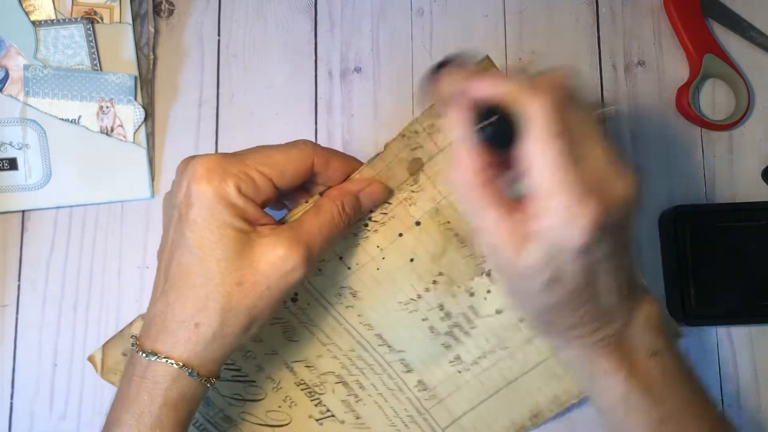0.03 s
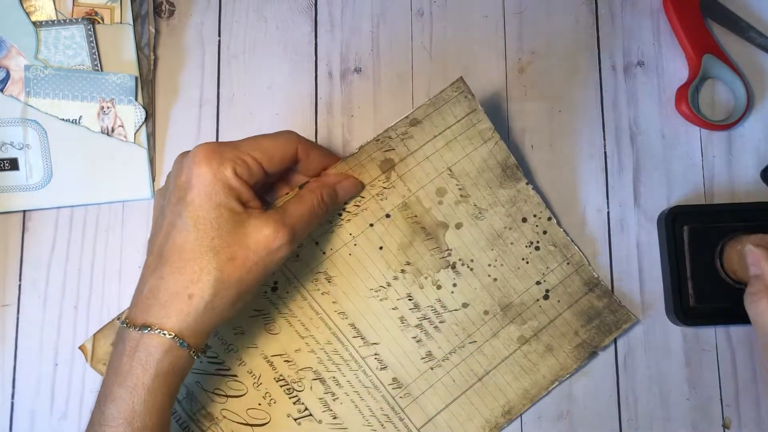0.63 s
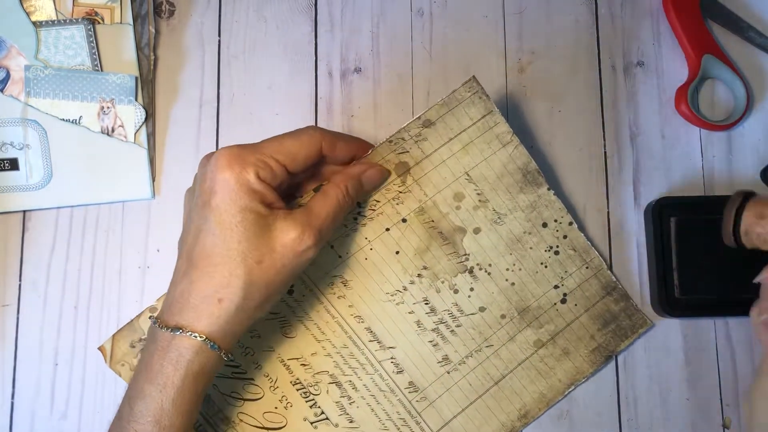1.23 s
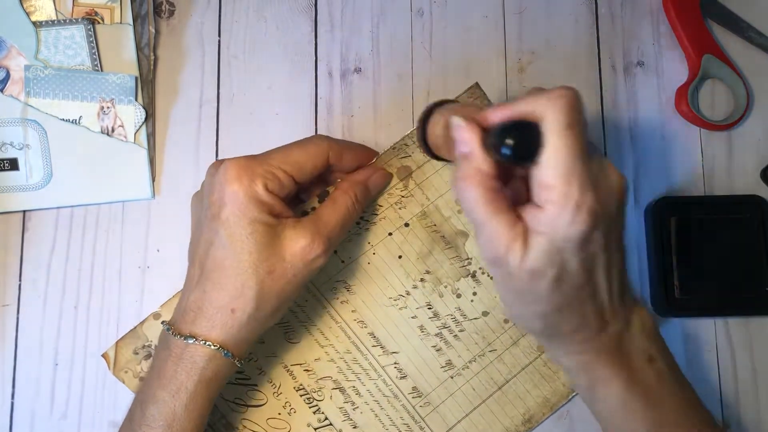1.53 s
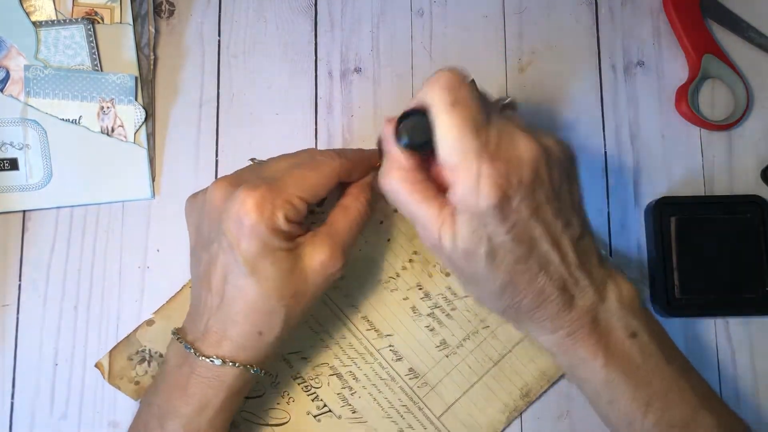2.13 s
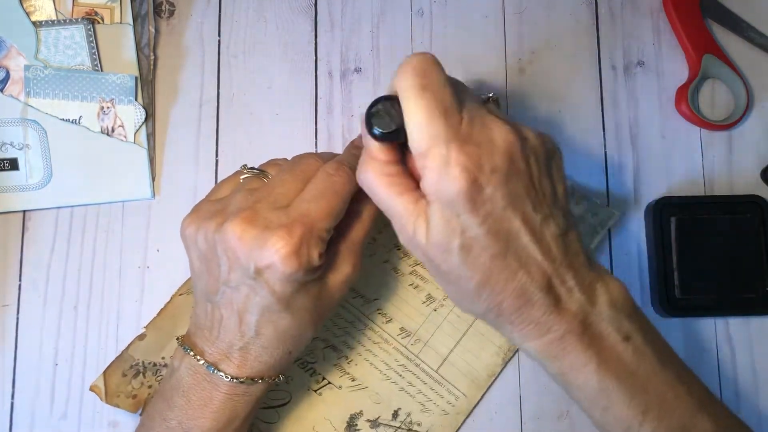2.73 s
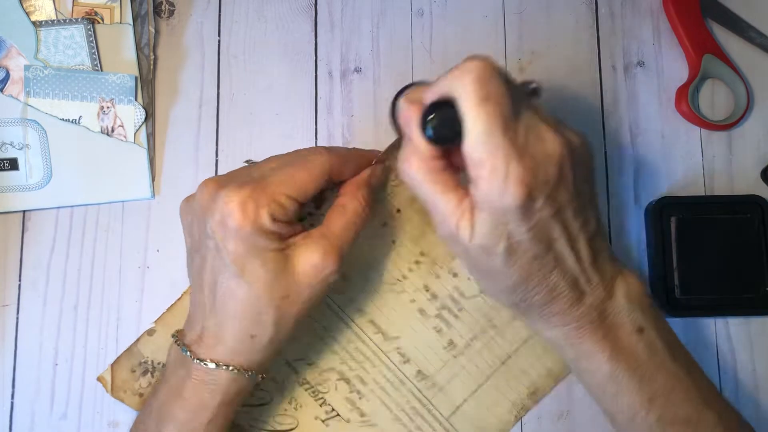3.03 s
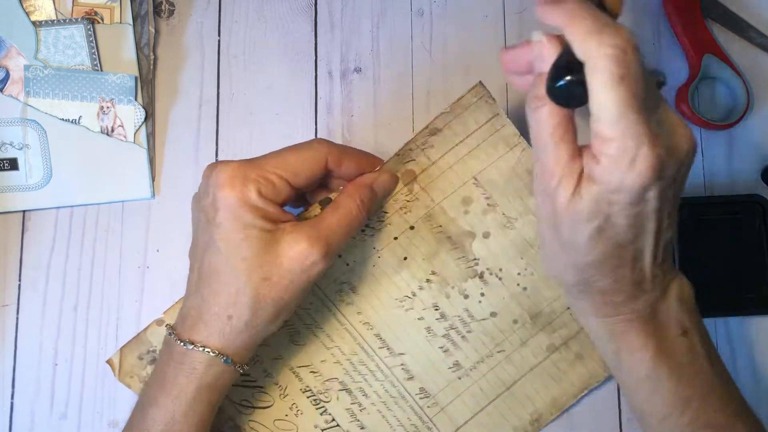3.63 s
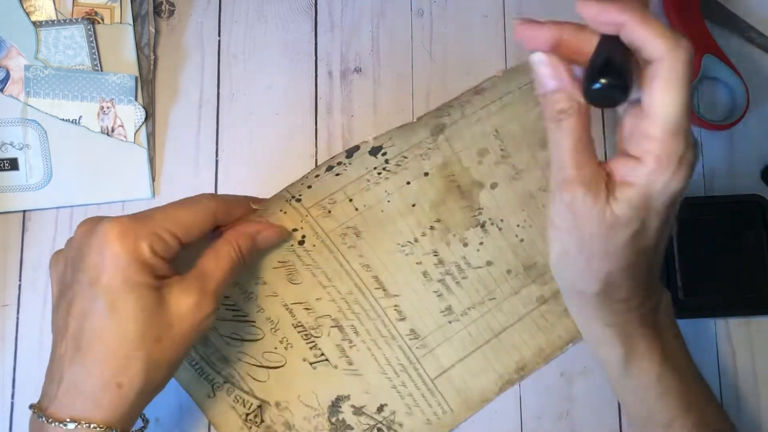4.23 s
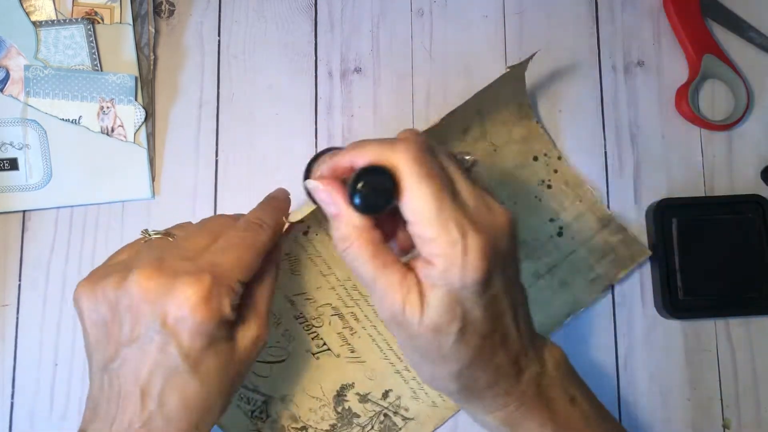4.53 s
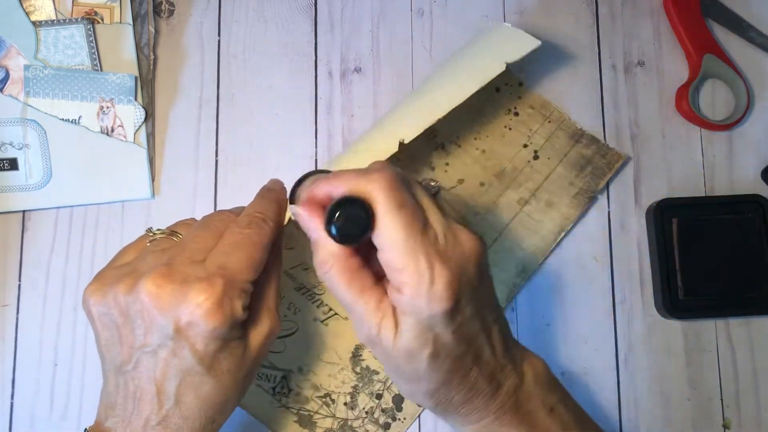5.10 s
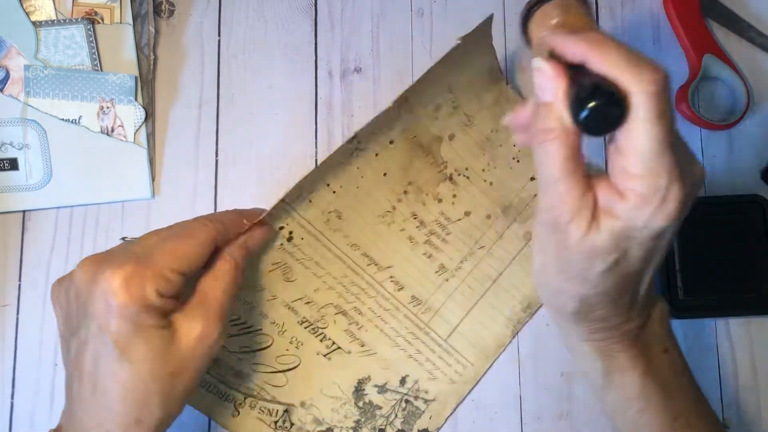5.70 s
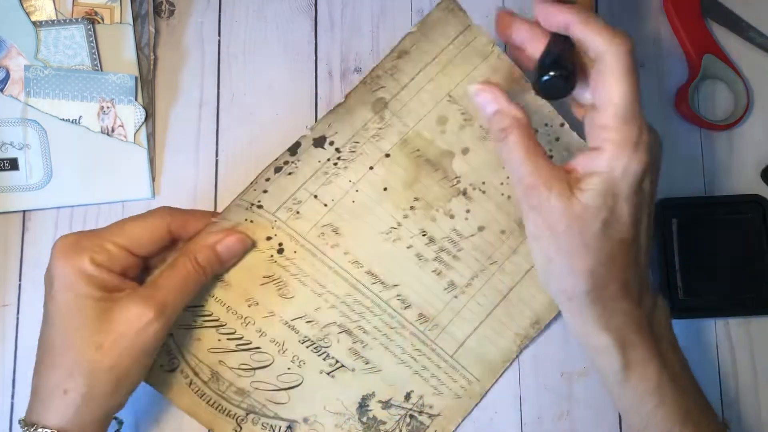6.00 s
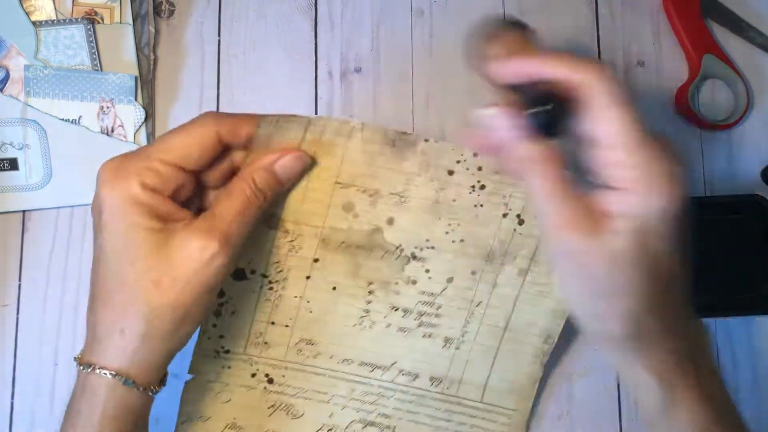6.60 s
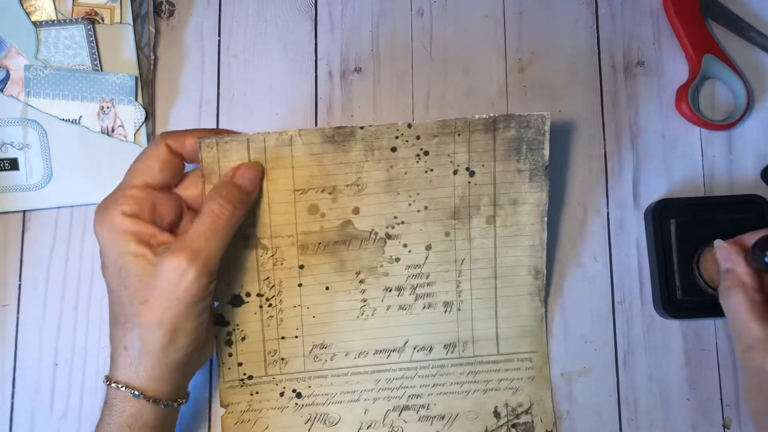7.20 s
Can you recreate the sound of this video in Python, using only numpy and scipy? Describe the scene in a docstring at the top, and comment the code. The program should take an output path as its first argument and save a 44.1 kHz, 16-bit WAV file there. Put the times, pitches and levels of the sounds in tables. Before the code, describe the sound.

Close up in a small, quiet room, foam rubs along the edge of a sheet of paper in two bouts of quick, dry scuffs, with a few sharp clicks of a wooden handle on the table. Before, between and after the bouts, the paper slides and gives small snaps. Faint dabs on an ink pad come near the start and at the end, over a soft low hum.

```python
"""Inking a paper edge with a foam tool

A foam blending tool scuffs the edge of a sheet in quick strokes, and friction sets paper and table ringing.
Its wooden handle knocks on the craft table and dabs the ink pad; between bouts the sheet slides
and snaps as it is turned. A soft 80 Hz hum fills the small, quiet room. The sound is close and mono."""
import sys
import numpy as np
from scipy import signal
from scipy.fft import rfft, irfft, next_fast_len
from scipy.io import wavfile
from scipy.ndimage import uniform_filter1d

SR = 44100
rng = np.random.default_rng(int(sys.argv[2]) if len(sys.argv) > 2 else 0)


def generate_wav(sig):
    """Save sig (samples, or channels by samples) to the path in sys.argv[1] as 16-bit PCM at SR."""
    pcm = np.round(np.clip(np.atleast_2d(sig).T, -1, 1) * 32767).astype(np.int16)
    wavfile.write(sys.argv[1], SR, pcm)


N = 324135
TIME = np.arange(N) / SR
HIT_SIZE = 4096   # samples in one impact


def scuffs(level_db):
    """Friction excitation: foam bites on the paper edge; grip and curl decide which parts ring."""
    # Each row: start in seconds, length in seconds, place of the peak from 0 to 1, relative level in dB,
    # share passed on to the table in dB.
    strokes = [(-0.02, 0.14, 0.37, -48.5, -12.5), (1.696, 0.1, 0.18, -55, -2),
               (1.791, 0.092, 0.43, -48.5, -8.5), (1.903, 0.12, 0.17, -52, -17),
               (2.013, 0.11, 0.4, -50, -5), (2.121, 0.12, 0.36, -49.5, -11), (2.228, 0.1, 0.24, -46.5, -8),
               (2.34, 0.099, 0.45, -46.5, -17), (2.427, 0.095, 0.45, -48, -10.5),
               (2.508, 0.048, 0.3, -52.5, -12), (2.54, 0.098, 0.46, -47.5, -8.5),
               (2.637, 0.099, 0.35, -49.5, -11), (2.75, 0.16, 0.26, -50, -10),
               (2.857, 0.14, 0.13, -51.5, -10), (2.983, 0.093, 0.56, -50, -5),
               (3.062, 0.11, 0.67, -58.5, -3), (3.185, 0.105, 0.43, -54, -12),
               (3.294, 0.1, 0.21, -52.5, -16), (3.392, 0.14, 0.49, -49, -33),
               (4.572, 0.089, 0.25, -51.5, -19), (4.639, 0.2, 0.14, -52.5, -7.5),
               (4.775, 0.1, 0.43, -48.5, -4.5), (4.866, 0.13, 0.54, -48.5, -14),
               (5.021, 0.12, 0.39, -48, -9.5), (5.134, 0.043, 0.6, -56, -21.5),
               (5.171, 0.13, 0.24, -47.5, -15), (5.305, 0.15, 0.22, -47, -9),
               (5.452, 0.19, 0.37, -46.5, -14.5)]
    # Spectra of what a stroke excites. Each row: frequency in Hz, relative density in dB.
    foam_rasp = [(1900, -6), (2700, -3.5), (3100, -1.5), (4100, 1.5), (4800, -1), (5800, 1.5), (7000, -1),
                 (8800, -6), (11000, -54)]
    paper_edge = [(650, -40), (800, 2), (920, 3.5), (1070, 13), (1450, 10), (1750, 0), (2100, -15),
                  (2700, 8), (3150, -3), (3600, 1.5), (4400, -19)]
    paper_sheet = [(1000, -17), (1500, 2), (1850, 13), (2250, 7.5), (2700, 0), (3300, -56)]
    fibre_air = [(7000, -15), (9000, -6), (12000, -9), (15800, -13.5)]
    table_rub = [(120, -1.5), (220, -6), (300, 9), (400, -8.5), (540, 5.5), (720, 1), (1000, -8)]
    # The edge is damped as the tool nears the holding fingers.
    # Each row: time in seconds, ring of the edge against the rasp in dB.
    edge_freedom = [(0.0, 0.5), (1.94, 1.5), (2.15, -4.5), (2.42, -13), (2.82, -11.5), (3.06, 5), (3.48, 0),
                    (4.78, -6), (5.0, -11)]
    # An edge curled off the table is brighter. Each row: time in seconds, curl from 0 to 1.
    edge_curl = [(0.0, 0.9), (1.9, 0.6), (2.2, 0), (3.3, 0.2), (3.5, 0.5), (4.6, 1), (5.6, 0.9)]
    brush_db, brush_stretch = -25.5, 1.18   # the lifting foam keeps brushing, softer and longer
    force, table_force = np.zeros((2, N))
    for start, length, peak, db, table_db in strokes:
        phase = swing(length, peak)
        pressure = np.abs(np.sin(np.pi * phase)) * np.interp(phase, [.5, 1], [1, .4])
        brush = np.abs(np.sin(np.pi * swing(length * brush_stretch, peak=.9)))
        push = np.sqrt(2) * pressure ** 3   # only the hardest part of a stroke moves the table
        add(force, start, pressure * from_db(db))
        add(force, start, brush * from_db(db + brush_db))
        add(table_force, start, push * from_db(db + table_db))
    edge_db = np.interp(TIME, *np.transpose(edge_freedom))
    curl = np.interp(TIME, *np.transpose(edge_curl))
    rasp = noise(foam_rasp)
    edge = from_db(edge_db) * noise(paper_edge)
    sheet = from_db(-10 + 5.5 * curl) * noise(paper_sheet)
    air = from_db(-8 + 4.5 * curl) * noise(fibre_air)
    rub = force * (rasp + edge + sheet + air) + table_force * noise(table_rub)
    roughness = grain(catch_db=1.07, catches_per_s=1900, judder_db=2.03, judders_per_s=140)
    return from_db(level_db) * rub * roughness


def sliding(body_db, hiss_db, air_db):
    """Sliding friction: paper hisses over wood and skin, brighter when the sheet is swung faster."""
    # Each row: start in seconds, length in seconds, relative level in dB, extra body and extra air in dB.
    slides = [(0.15, 0.045, -60, -1, 2), (0.189, 0.15, -55, -2, -0.5), (0.31, 0.26, -70.5, 0.5, 9),
              (0.593, 0.34, -61.5, -4.5, 1), (0.861, 0.21, -57.5, -3, 2), (1.06, 0.2, -56, -1, -0.5),
              (1.175, 0.091, -55.5, -5.5, -2.5), (1.285, 0.15, -66, -1.5, 4), (1.567, 0.11, -65.5, 3.5, 2),
              (3.606, 0.097, -59, 0, -3), (3.766, 0.13, -49.5, 4, -1), (3.896, 0.095, -55, 1.5, 3.5),
              (3.981, 0.078, -47.5, 0, -3), (4.048, 0.035, -59.5, -0.5, -2), (4.075, 0.12, -52.5, 3.5, 1),
              (4.172, 0.16, -55, 4, 1.5), (4.344, 0.75, -64.5, 1, 7), (4.537, 0.05, -59.5, -2.5, 3),
              (5.587, 0.15, -54, -1.5, -1), (5.765, 0.16, -63.5, 3, 4), (6.028, 0.043, -55.5, 5.5, 0),
              (6.06, 0.18, -55.5, 3, 0), (6.202, 0.36, -51.5, 1.5, 1.5), (6.487, 0.53, -57.5, 0.5, 0.5),
              (6.913, 0.47, -59.5, 0, 4)]
    # Spectrum of the rub. Each row: frequency in Hz, relative density in dB.
    colour = [(250, -10), (480, -11.5), (700, -14), (930, 1), (1100, 2.5), (1450, -1), (2150, 0),
              (2700, -0.5), (4500, 3.5), (5150, 4), (5800, -1), (6900, -2), (8200, -10), (16000, -18)]
    usual_db, body_growth, air_growth = -54, 0.74, 1.7   # growth in dB per dB of hiss
    rub = noise(colour)
    body = cut(rub, 2500, "low", order=4)
    hiss = cut(cut(noise(colour), 2500, "high", order=4), 8000, "low", order=4)
    air = cut(rub, 8000, "high", order=4)
    power = np.zeros((3, N))
    for start, length, db, extra_body_db, extra_air_db in slides:
        speed = np.abs(np.sin(np.pi * swing(length, peak=0.33))) ** 0.69
        vigour_db = db - usual_db
        levels = (body_db + body_growth * vigour_db + extra_body_db,
                  hiss_db + vigour_db,
                  air_db + air_growth * vigour_db + extra_air_db)
        for band_power, band_db in zip(power, levels):
            add(band_power, start, (speed * from_db(usual_db + band_db)) ** 2)
    out = np.sum(np.sqrt(power) * [rms_one(band) for band in (body, hiss, air)], axis=0)
    return out * grain(catch_db=2.0, catches_per_s=1700, judder_db=1.5, judders_per_s=69)


def knocks(knock_db, tap_db, dab_db):
    """Impact excitation: hard knocks, cushioned taps and the rocking ink pad sound through the table."""
    # The handle hits the table. Each row: time in seconds, relative level in dB, low and high edge in Hz,
    # chatter in seconds, bending-wave lag in seconds, ring of the handle in dB.
    handle_knocks = [(1.7093, -25, 860, 4100, 0.00045, 0.00075, 9.5),
                     (2.051, -42.5, 100, 7700, 0.0014, 0.0019, 1),
                     (2.386, -45, 150, 8050, 0.0014, 0.002, -1),
                     (2.587, -48.5, 100, 8000, 0.0011, 0.00274, -12),
                     (3.504, -32, 1200, 4080, 0.0023, 0.0018, -11),
                     (3.8304, -39, 398, 4570, 0.0036, 0.0027, -1),
                     (4.7545, -29.5, 200, 4180, 0.0016, 0.00255, 8),
                     (4.813, -31, 250, 4940, 0.0025, 0.0011, 12)]
    # Foam, hand or sheet lands softly. Each row: time in seconds, relative level in dB,
    # low and high edge in Hz, chatter in seconds.
    taps = [(0.061, -51.5, 80, 1200, 0.0055), (0.228, -48, 150, 1100, 0.004), (0.301, -52, 150, 730, 0.002),
            (2.794, -52, 300, 362, 0.0022), (2.957, -52, 150, 503, 0.0019),
            (3.037, -46, 59.6, 1100, 0.0019), (3.6856, -44.5, 200, 1030, 0.0022),
            (3.938, -48, 200, 1960, 0.003), (4.584, -52.5, 100, 294, 0.0017),
            (6.122, -47.5, 600, 1040, 0.0041), (6.156, -51, 1000, 1300, 0.00406),
            (6.262, -50, 200, 1260, 0.0041), (6.4621, -48, 700, 1100, 0.0038),
            (6.472, -39, 990, 1390, 0.003), (6.486, -48, 200, 1300, 0.0046)]
    # The ink pad rocks under the tool. Each row: time in seconds, relative level in dB.
    dabs = [(0.758, -56), (0.779, -58), (0.808, -54.5), (0.845, -56), (0.869, -55), (7.214, -52),
            (7.304, -58.5), (7.331, -57.5)]
    out = np.zeros(N)
    for start, db, *touch in handle_knocks:
        add(out, start, blow(db + knock_db, *touch))
    for start, db, *touch in taps:
        add(out, start, blow(db + tap_db, *touch, lag_s=0.00325, handle_db=1))
    for start, db in dabs:
        dab = blow(db + dab_db, low_hz=302, high_hz=800, chatter_s=0.00062, lag_s=0.00545, handle_db=1)
        add(out, start, dab)
    return out


def blow(db, low_hz, high_hz, chatter_s, lag_s, handle_db):
    """Dispersion: bending waves carry highs faster than lows, so the ring of a blow falls in pitch."""
    # Modes of table top and wooden handle. Each row: frequency in Hz, bandwidth in Hz, gain in dB.
    table_modes = [(146, 46, -1), (277, 95, 0), (346, 94, -10.5), (500, 240, -8.5), (690, 170, -15),
                   (815, 130, -5.5), (1030, 106, 3.5), (1203, 72, 3.5), (1407, 62, -2), (1640, 80, -3)]
    handle_modes = [(1970, 440, -4.5), (2460, 330, -10.5), (4080, 860, -14.5), (6500, 3400, -14)]
    hz = np.fft.rfftfreq(HIT_SIZE, 1 / SR) + 1
    body = ringing(table_modes, hz) + from_db(handle_db) * ringing(handle_modes, hz)
    force = bounces(chatter_s, rebound=0.5, count=3)
    force = cut(cut(force, low_hz, "high", order=1), high_hz, "low", order=3)
    delay_s = lag_s * np.maximum(np.sqrt(1000 / hz) - np.sqrt(500 / high_hz), 0)
    travel = np.exp(-2j * np.pi * np.cumsum(delay_s) * SR / HIT_SIZE)
    return at_level(irfft(rfft(force) * body * travel), db)


def ringing(modes, hz):
    """Modal superposition: a body's frequency response is the sum of its damped resonances."""
    return sum(from_db(db) / (1 + 1j * (hz ** 2 - mode_hz ** 2) / (hz * width))
               for mode_hz, width, db in modes)


def bounces(chatter_s, rebound, count):
    """All-pass chain: tiny rebounds spread a blow in time and leave its colour alone."""
    turn = -2j * np.pi * np.fft.rfftfreq(HIT_SIZE)
    force = 1
    for gap in np.ceil(rng.uniform(.4, 1.6, count) * chatter_s * SR / count):
        delay = np.exp(turn * gap)
        force = force * (rebound + delay) / (1 + rebound * delay)
    return irfft(force)


def snaps(level_db, spread):
    """Sudden elastic release: the sheet buckles, slips off a fingernail or is caught by the foam."""
    # Each row: time in seconds, relative level in dB, band centre in Hz, crumple time in seconds.
    paper_snaps = [(0.6143, -46.5, 2900, 0.0036), (0.649, -50.5, 2400, 0.0007), (1.8095, -51, 2600, 0.0016),
                   (1.8485, -56, 2600, 0.00042), (1.9238, -53, 1700, 0.0018), (2.033, -51, 2000, 0.0013),
                   (2.2406, -46.5, 2000, 0.0017), (2.31, -42, 4100, 0.0095), (2.7868, -50, 2700, 0.0043),
                   (3.0226, -46, 2410, 0.002), (3.089, -53, 2400, 0.0013), (3.1954, -54.5, 2490, 0.00073),
                   (3.312, -50, 2800, 0.0018), (3.771, -56.5, 2500, 0.0023), (3.8604, -44, 1700, 0.0041),
                   (3.9237, -41.5, 2110, 0.0058), (4.1151, -45.5, 2000, 0.0012),
                   (4.263, -42.5, 2410, 0.0031), (4.292, -56, 2000, 0.0023), (4.88, -49, 4500, 0.004),
                   (5.0315, -44, 1850, 0.0036), (5.2447, -47.5, 2800, 0.002), (5.347, -38.5, 2200, 0.0021),
                   (5.5387, -44.5, 4000, 0.00088), (5.774, -54, 2380, 0.0051), (6.4009, -46, 2000, 0.0017),
                   (6.5492, -47, 3160, 0.0045), (7.0107, -44, 3500, 0.00025)]
    out = np.zeros(N)
    for start, db, hz, crumple_s in paper_snaps:
        crackle = contact(crumple_s, chatter_db=-6.5)
        crackle = cut(cut(crackle, hz / spread, "high", order=2), hz * spread, "low", order=2)
        add(out, start, at_level(crackle, db + level_db))
    return out


def contact(chatter_s, chatter_db):
    """Contact chatter: an impulse, then a run of tiny bounces that swells and dies."""
    age = TIME[:HIT_SIZE] / chatter_s
    force = from_db(chatter_db) * rng.standard_normal(HIT_SIZE) * np.sqrt(age) * np.exp(-age)
    force[0] += 1
    return force


def crinkles(rubbing, level_db, per_s, spread_db):
    """Shot noise: single fibres flick free at random, ticking louder the harder the rub."""
    effort = np.sqrt(np.abs(uniform_filter1d(rubbing ** 2, size=882)))   # rms over 20 ms
    sizes = from_db(spread_db * np.minimum(rng.exponential(1, N), 3)) * rng.choice([-1, 1], N)
    ticks = sizes * (rng.random(N) < per_s / SR) + 1e-18
    ticks = cut(cut(ticks, 830, "high", order=2), 9200, "low", order=1)
    return from_db(level_db) * effort * rms_one(ticks)


def pad_twist():
    """Light friction: foam twisted on the ink pad sings in a few low and middle bands."""
    # Each row: time in seconds, level in dB.
    envelope = [(.64, -85), (.68, -57), (.76, -72), (.87, -60.5), (.95, -60.5), (1.04, -65), (1.14, -60),
                (1.24, -81), (1.28, -88)]
    # Each row: frequency in Hz, relative density in dB.
    colour = [(250, -15), (430, 1), (560, -7), (700, -10), (1300, -3), (1800, -5), (2150, -1), (2700, -17),
              (4000, -28)]
    return soft_rub(envelope, colour)


def fingertip_glide():
    """Skin friction: fingertips gliding over the sheet hiss in a narrow band near 5 kHz."""
    # Each row: time in seconds, level in dB.
    envelope = [(6.55, -83), (6.65, -83), (6.8, -75), (6.95, -68), (7.1, -69), (7.29, -61), (7.35, -87)]
    # Each row: frequency in Hz, relative density in dB.
    colour = [(3800, -28), (4700, -3), (5100, 2), (5500, -9), (6300, -20)]
    return soft_rub(envelope, colour)


def soft_rub(envelope, colour):
    """Amplitude modulation: a slow rub is coloured noise under a smooth envelope and a coarse grain."""
    times, db = np.transpose(envelope)
    rub = np.interp(TIME, times, from_db(db), left=0, right=0) * noise(colour)
    return rub * grain(catch_db=3.5, catches_per_s=550, judder_db=2.5, judders_per_s=62)


def grain(catch_db, catches_per_s, judder_db, judders_per_s):
    """Uneven friction as a gain of rms 1: single fibres catch, and the hand judders more slowly."""
    return rms_one(from_db(catch_db * drift(catches_per_s) + judder_db * drift(judders_per_s)))


def swing(length_s, peak):
    """Progress of a hand movement from 0 to 1, passing halfway at the share `peak` of its time."""
    elapsed = np.linspace(0, 1, round(length_s * SR))
    return np.interp(elapsed, [0, peak, 1], [0, .5, 1])


def near_echoes(x, echo_db, longest_s, moves_per_s):
    """Comb filtering: echoes off sheet and hand travel shifting paths, so the colour keeps changing."""
    out = x.copy()
    for path in (.5, .75, 1):
        lag_s = longest_s * path * from_db(2.77 * drift(moves_per_s))
        out += from_db(echo_db) * np.interp(TIME - lag_s, TIME, x)
    return out / np.sqrt(1 + 3 * from_db(echo_db) ** 2)


def reflections(x, t60, onset_s, wall_hz, level_db):
    """Diffuse reverberation: a dense, dull cloud of echoes builds up and decays exponentially."""
    t = TIME[:SR // 2]
    cloud = cut(rng.standard_normal(len(t)), wall_hz, "low", order=1)
    cloud *= from_db(-60 * t / t60) * (1 - np.exp(-(t / onset_s) ** 2))
    return from_db(level_db) * signal.fftconvolve(x, cloud / np.sqrt(np.sum(cloud ** 2)))[:N]


def background(noise_db, hum_db, hum_hz, waver_hz):
    """Noise floor: a low hum wavering in pitch and level, faint steady tones and room noise."""
    # Each row: time in seconds, relative level of the hum in dB.
    hum_levels = [(0.0, -56.5), (1.0, -58.5), (1.8, -58), (2.75, -61.5), (3.23, -66.5), (3.7, -58.5),
                  (4.28, -52), (5.1, -56.5), (7.35, -59)]
    # Each row: frequency in Hz, level in dB.
    faint_tones = [(48.4, -70.5), (60, -70), (120, -70.5)]
    # Each row: frequency in Hz, relative density in dB.
    room_noise = [(22, -43), (36, -34), (46, -1), (62, -4.5), (100, -10.5), (150, -10), (250, -12.5),
                  (420, -16), (700, -22), (1100, -24), (3000, -26.5), (8000, -33.5), (16000, -41.5)]
    phase = 2 * np.pi * np.cumsum(hum_hz + waver_hz * drift(3.6)) / SR
    hum = from_db(np.interp(TIME, *np.transpose(hum_levels)) + hum_db) * np.sin(phase)
    tones = sum(from_db(db) * np.sin(2 * np.pi * (hz * TIME + rng.random())) for hz, db in faint_tones)
    return np.sqrt(2) * (hum + tones) + from_db(noise_db) * noise(room_noise)


def noise(spectrum):
    """Spectral shaping: white noise takes on the given spectrum, at rms 1."""
    size = next_fast_len(N)
    hz, db = np.transpose(spectrum)
    log_bins = np.log(np.fft.rfftfreq(size, 1 / SR) + 1)
    gain = from_db(np.interp(log_bins, np.log(hz), db, left=-np.inf, right=-np.inf))
    return rms_one(irfft(rfft(rng.standard_normal(size)) * gain, size)[:N])


def drift(per_s):
    """A random course with so many turns a second, at rms 1."""
    knots = rng.standard_normal(N // 4)
    return rms_one(np.interp(TIME * per_s, np.arange(len(knots)), knots))


def at_level(hit, db, window_s=.01):
    """Give a hit the energy of a short window at that level."""
    return hit * from_db(db) * np.sqrt(window_s * SR / np.sum(hit ** 2))


def cut(x, hz, kind, order):
    """Butterworth high- or low-pass."""
    return signal.sosfilt(signal.butter(order, hz, kind, fs=SR, output="sos"), x)


def add(out, start_s, sound):
    """Superpose a sound from a time on."""
    at = round(start_s * SR)
    out[max(at, 0):at + len(sound)] += sound[max(-at, 0):N - at]


def from_db(db):
    """Decibels to gain."""
    return 10 ** (np.asarray(db) / 20)


def rms_one(x):
    """Scale to an rms of 1."""
    return x / np.sqrt(np.mean(x ** 2) + 1e-20)


def scene():
    """Superposition: the handling, its desk and room echoes and the background, alike in both channels."""
    inking = near_echoes(scuffs(level_db=-0.33), echo_db=-13.5, longest_s=0.00108, moves_per_s=7)
    slides = sliding(body_db=-2.5, hiss_db=-2.0, air_db=-5.0)
    turning = near_echoes(slides, echo_db=-12.0, longest_s=0.000697, moves_per_s=6)
    rubbing = inking + turning
    work = rubbing + crinkles(rubbing, level_db=-11.5, per_s=130, spread_db=1.5)
    work += pad_twist() + fingertip_glide()
    work += knocks(knock_db=0.5, tap_db=2, dab_db=0.5) + snaps(level_db=-1, spread=1.87)
    desk = reflections(work, t60=0.048, onset_s=0.0017, wall_hz=2400, level_db=-15.0)
    room = reflections(work, t60=0.26, onset_s=0.01, wall_hz=900, level_db=-23)
    floor = background(noise_db=-63.5, hum_db=-2.5, hum_hz=79.6, waver_hz=0.67)
    return np.tile(work + desk + room + floor, (2, 1))


def record(dry):
    """Band limiting: a steep elliptic low-pass removes the treble above 15.9 kHz."""
    return signal.sosfilt(signal.ellip(10, .1, 70, 15900, fs=SR, output="sos"), dry)


dry = scene()
out = record(dry)
generate_wav(out)
```